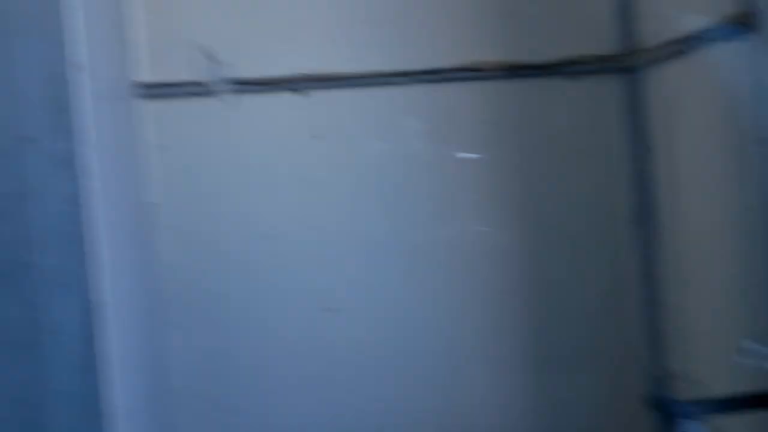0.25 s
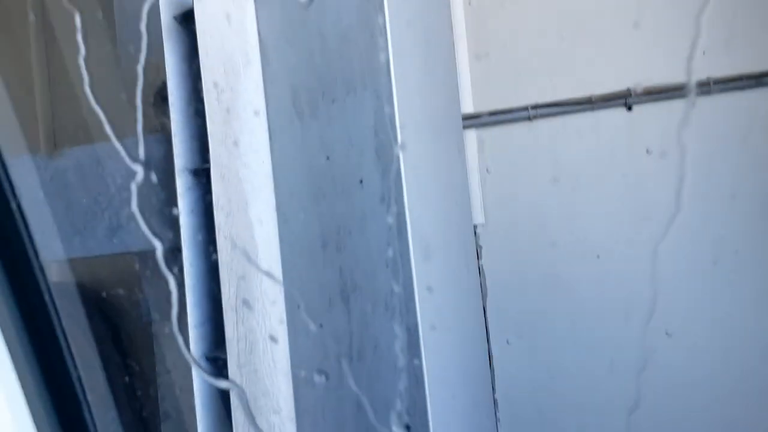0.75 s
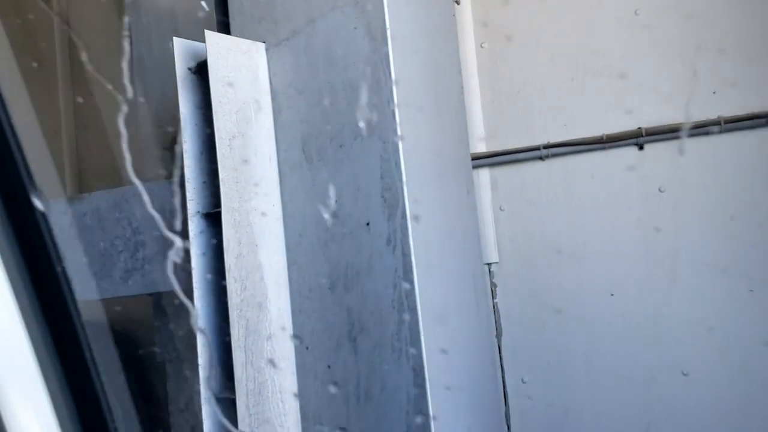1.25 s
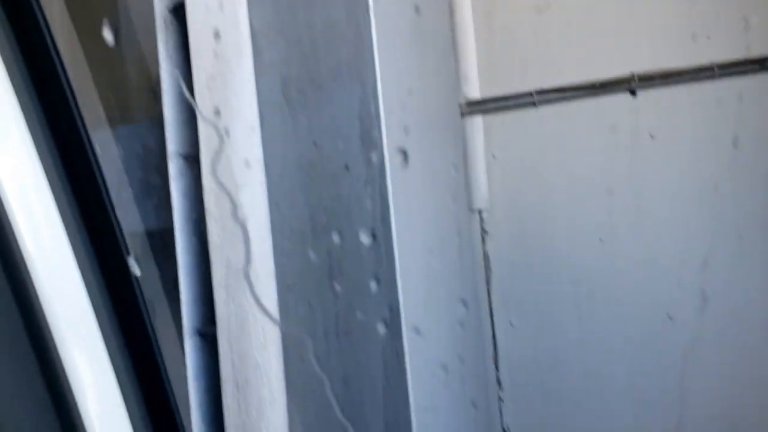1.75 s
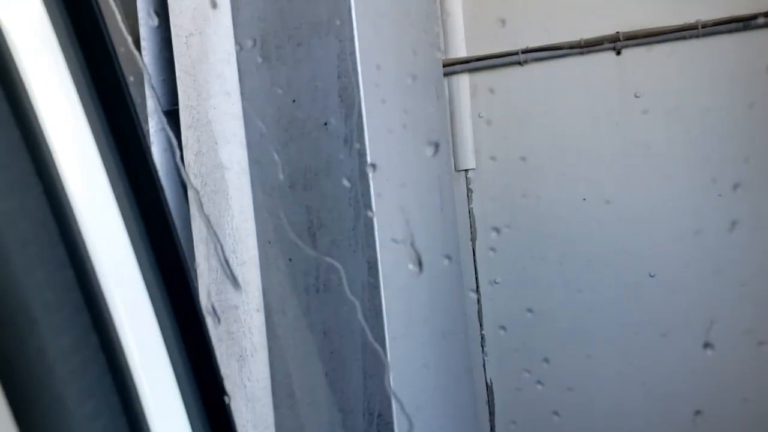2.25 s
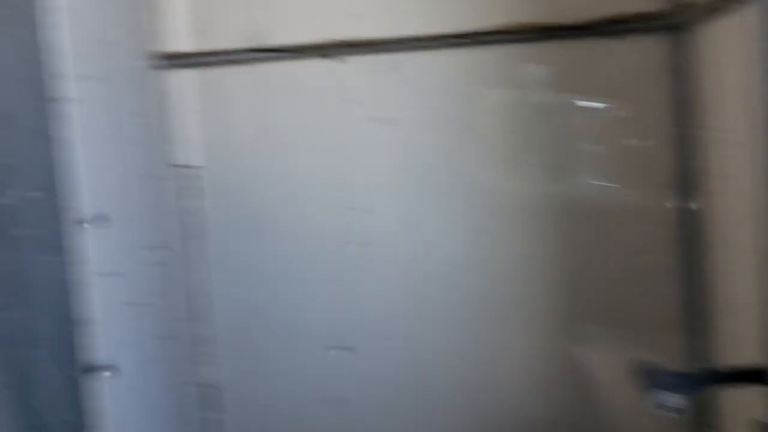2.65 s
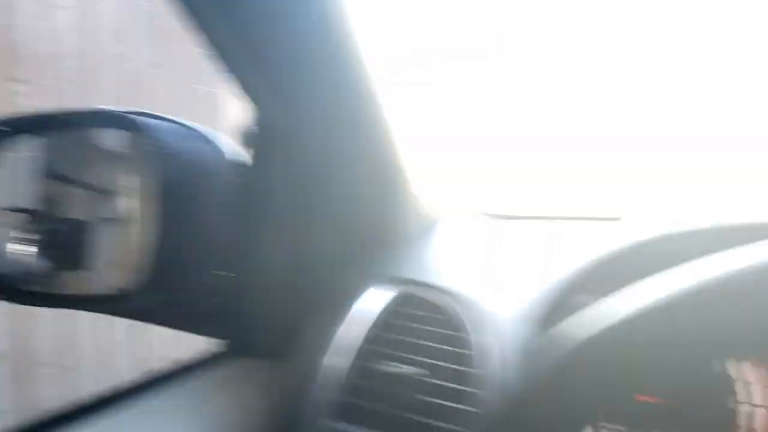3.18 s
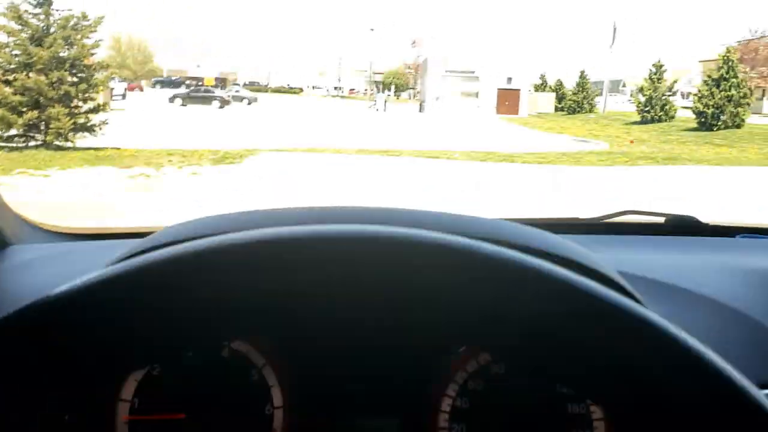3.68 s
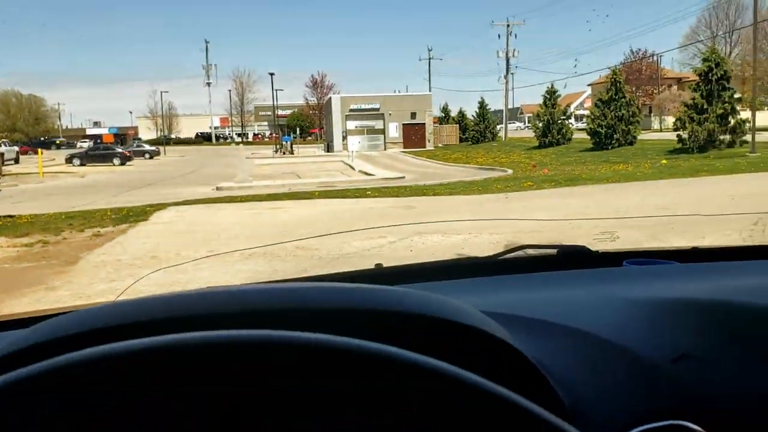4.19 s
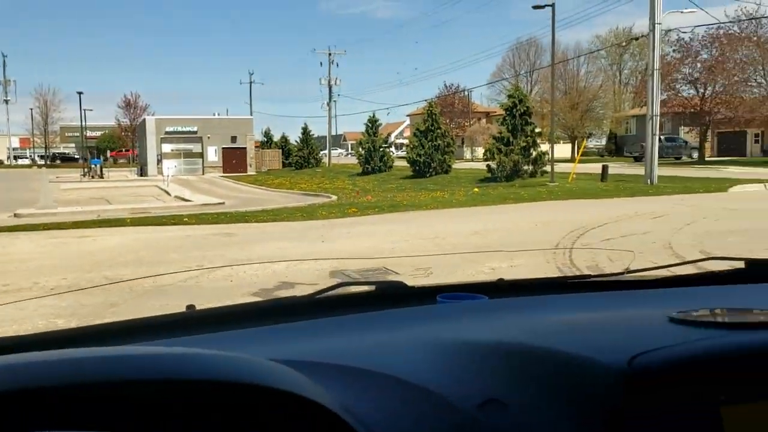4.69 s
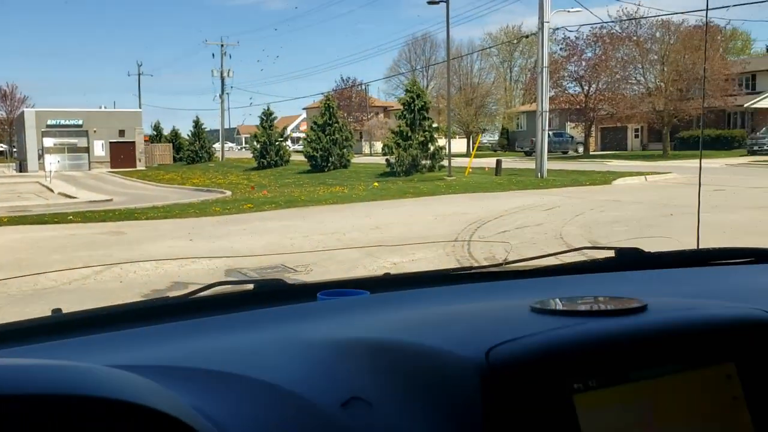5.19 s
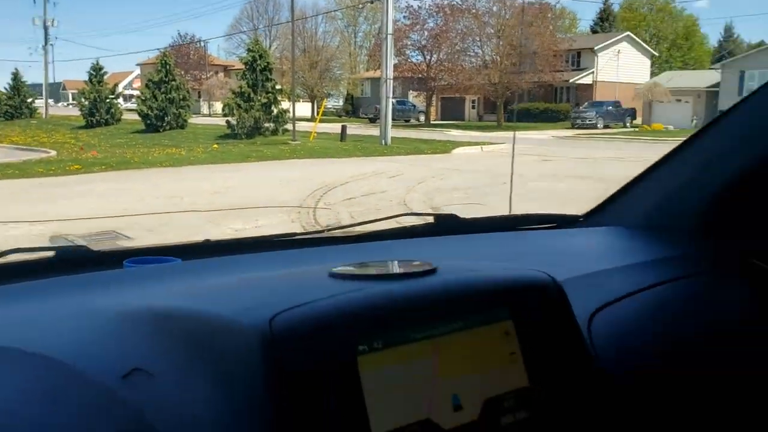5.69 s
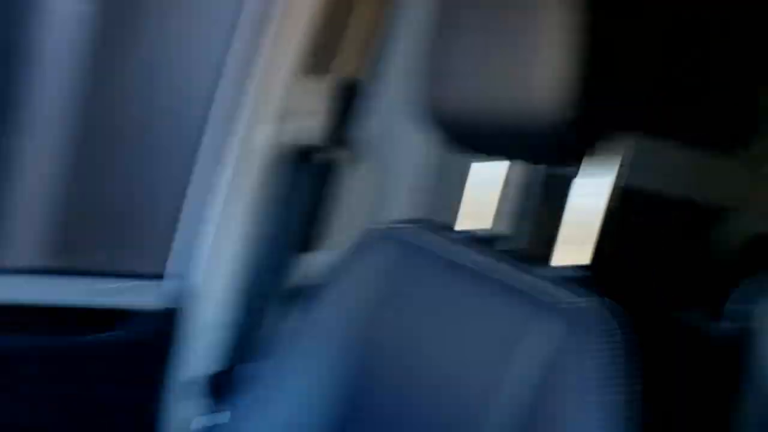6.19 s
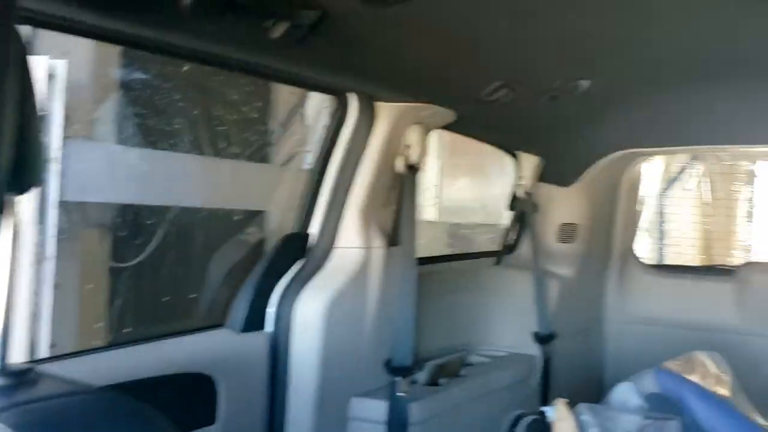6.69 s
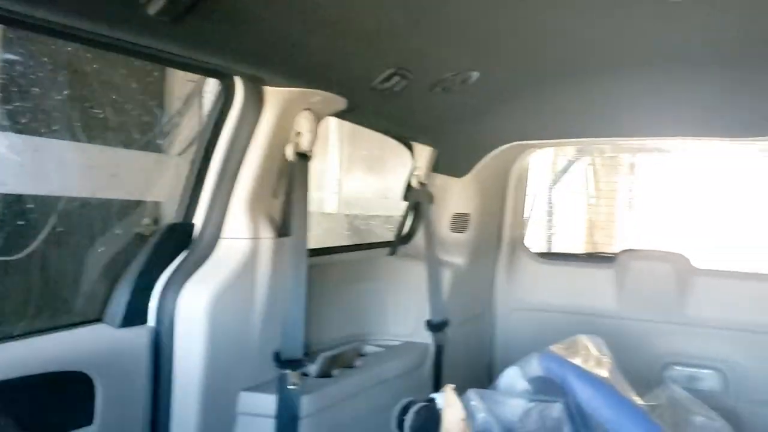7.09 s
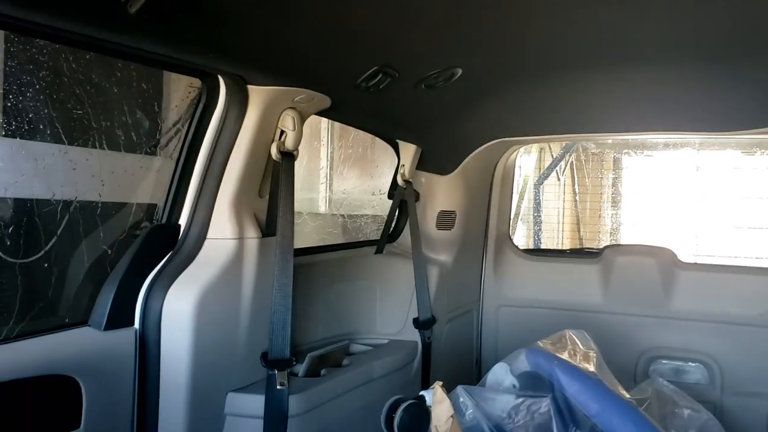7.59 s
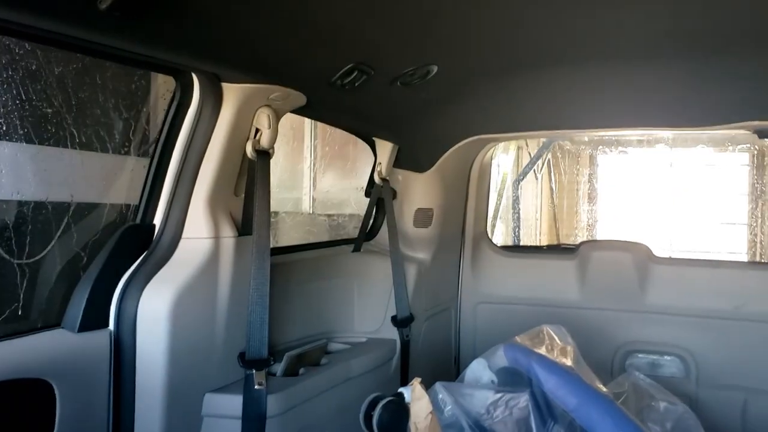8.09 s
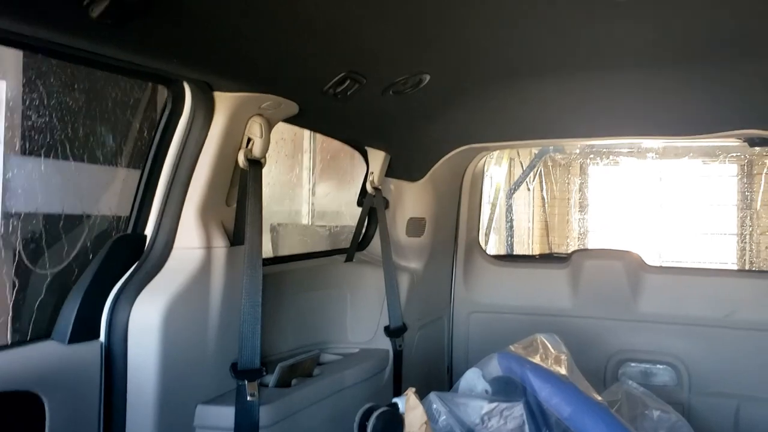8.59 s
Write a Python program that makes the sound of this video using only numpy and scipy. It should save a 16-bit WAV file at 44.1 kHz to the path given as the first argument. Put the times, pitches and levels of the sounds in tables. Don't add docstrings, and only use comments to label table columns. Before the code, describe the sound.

From 0 to about 8.9 seconds, large air dryers in a car wash roar without pause, heard on a handheld stereo phone inside a closed vehicle. Low boom and a wavering deep hum dominate as jets beat the panels and roof; unsteady fan tones barely rise above it, and hiss is dulled by glass. The jets are nearest around 0.4 seconds, then slowly ease until 6, recovering slightly by 8. Very faint key contacts occur from 0.7 to 1.6, with a brighter quick tinkle at 2.75. Cloth slides softly at the start, around 3 and near 6.2. A brief hum surge comes at 5.5. Finger rubbing peaks around 6.2, right-sided. Sparse trim ticks become more common after 6.6, alongside small dry case taps, densest from 8.1 to 8.8. The roar continues to the end.

```python
import sys
import numpy as np
from scipy import signal
from scipy.fft import rfft, irfft
from scipy.io import wavfile
from scipy.ndimage import uniform_filter1d, map_coordinates

SR = 44100
rng = np.random.default_rng(int(sys.argv[2]) if len(sys.argv) > 2 else 0)


def persist_wave(psi):
    counts = np.round(np.clip(psi, -1, 1) * 32767).astype(np.int16)
    wavfile.write(sys.argv[1], SR, np.atleast_2d(counts).T)


def natural_amplitude(level_db):
    exponent = np.asarray(level_db, float) / 20
    return 10 ** exponent


N = 390285


def unit(x):
    return x / np.sqrt(np.mean(x ** 2) + 1e-20)


def along(points, hz):
    f, v = np.transpose(points)
    return np.interp(np.log(hz + 1), np.log(f + 1), v)


def spectrum(points):
    return lambda hz: natural_amplitude(along(points, hz))


def resonant(modes, steep):
    def gain(f):
        power = 0
        for center, width, db in modes:
            peak = abs(f * width / (center * center - f * f + 1j * f * width))
            power = power + (natural_amplitude(db) * peak ** steep) ** 2
        return np.sqrt(power)
    return gain


def filtered(x, response):
    return irfft(rfft(x) * response(np.fft.rfftfreq(N, 1 / SR)), N)


def curves(rows):
    s, *columns = np.transpose(rows)
    return [np.interp(np.arange(N) / SR, s, c) for c in columns]


def wobble(knots_per_s):
    knots = rng.standard_normal(int(N * knots_per_s / SR) + 4)
    return map_coordinates(knots, [np.arange(N) * knots_per_s / SR])


def sides(db):
    ratio = natural_amplitude(-np.asarray(db))
    return np.array([2 / (1 + ratio), 2 * ratio / (1 + ratio)])


# t/s, heading (0 side window, 1 windscreen, 2 rear seats)
HEADING = [
    (0, 0),
    (2.7, 0.12),
    (3.2, 0.8),
    (5.7, 1.4),
    (6.6, 2),
    (8.85, 2),
]


def faced(db, s=None):
    heading, = curves(HEADING)
    if s is not None:
        heading = heading[(s * SR).astype(int)]
    return np.interp(heading, [0, 1, 2], db)


# f/Hz, correlation
LIKENESS = [(30, 0.99), (80, 1), (200, 0.97), (400, 0.81), (550, .5), (800, .2), (1300, -0.29),
            (2200, 0.053)]


def rush(gain, even_s=0):
    def mid_side(hz):
        angle = np.arccos(np.clip(along(LIKENESS, hz), -1, 1)) / 2
        return gain(hz) * [np.cos(angle), np.sin(angle)]

    mid, side = filtered(rng.standard_normal((2, N)), mid_side)
    pair = np.array([mid + side, mid - side]) / np.std(mid)
    if even_s:
        width = round(even_s * SR)
        power = np.abs(uniform_filter1d(uniform_filter1d(mid ** 2, width), width))
        pair = pair / np.sqrt(power / np.var(mid) + 0.15)
    return pair


def swaying(modes, tilt_db):
    first, second = (rush(resonant([mode], 1.817), even_s=0.18) * natural_amplitude(mode[2]) for mode in modes)
    share = natural_amplitude(tilt_db / 2)
    total = np.hypot(share * natural_amplitude(modes[0][2]), natural_amplitude(modes[1][2]) / share)
    return (share * first + second / share) / total


def swell(depth):
    return depth * 2.5 * wobble(8.5)


# t/s, level/dB
NEARNESS = [(0, 3.5), (.4, 4.5), (.6, 3), (1.5, 2), (2.6, 0), (3.6, -0.5), (5, -1.5), (6, -3), (7, -1.5),
            (8.15, -0.5), (8.55, -0.5), (8.85, -1.2)]


def nearness_db():
    return curves(NEARNESS)[0]


# f/Hz, width/Hz, level/dB
BOOM_MODES = [(50, 38, -0.5), (97, 46, 2)]


def boom():
    near_db = nearness_db()
    level_db = faced((-23.5, -23.5, -22.5)) + 1.1 * near_db + swell(1)
    tilt_db = faced((-1, 0.2, -1.5)) - 1.3 * near_db
    return natural_amplitude(level_db) * swaying(BOOM_MODES, tilt_db)


# f/Hz, width/Hz, level/dB
HUM_MODES = [(127.3, 23.8, -1.6), (155.2, 26.3, -0.47)]
# t/s, force/dB, upper over lower hum mode/dB
SIDE_JETS = [(0, -20, 3.5), (.9, -16.5, 2), (1.0, -22.5, 2), (1.15, -19.5, 3), (1.6, -22, 1),
             (1.75, -15, 4.5), (2.8, -18, 0.5), (3, -14, 2), (3.12, -18, -0.5), (3.68, -16, 1.5),
             (3.9, -20.5, -1), (4.7, -17, 0.3), (5.3, -21.5, -2.5), (5.51, -13, -2.5), (5.62, -20, -2.5),
             (7.95, -23, -3), (8.12, -29.5, -4), (8.6, -20, -9.5)]


def hum():
    force_db, tilt_db = curves(SIDE_JETS)
    pan_db = faced((1.5, 3.5, 0.1)) + 0.88 * wobble(5.5)
    return natural_amplitude(force_db + 0.33 + swell(0.46)) * sides(pan_db) * swaying(HUM_MODES, -tilt_db)


# f/Hz, width/Hz, level/dB
CROSS_MODES = [(217.7, 71, 0)]


def cross():
    level_db = faced((-28, -38, -25)) + 0.53 * nearness_db() + swell(0.8)
    return natural_amplitude(level_db) * rush(resonant(CROSS_MODES, 2.22), even_s=0.077)


# f/Hz, width/Hz, level/dB
ROOF_MODES = [(302.6, 45, 1.4), (349, 42, 0), (384, 32, -8.5)]
# t/s, force/dB
OVERHEAD_JET = [(0, -30.5), (.45, -28), (1, -31.5), (1.4, -28.5), (2.3, -32), (3.2, -31), (4, -27.5),
                (4.8, -29), (5.7, -30), (6.7, -28.5), (7.6, -30.5), (8.85, -28)]


def roof():
    force_db, = curves(OVERHEAD_JET)
    return natural_amplitude(force_db - 0.06 + swell(0.6)) * rush(resonant(ROOF_MODES, 1.98), even_s=0.079)


def drumming():
    return boom() + hum() + cross() + roof()


# f/Hz, wander/Hz, level/dB
BLADE_TONES = [(348.2, 2.487, -38), (1730, 3., -72.5)]


def fans():
    out = 0
    for hz, wander_hz, db in BLADE_TONES:
        level_db = db + faced((1, 3, -6.5)) + 3.2 * wobble(1.1)
        phase = 2 * np.pi * np.cumsum(hz + wander_hz * wobble(0.8)) / SR
        out = out + natural_amplitude(level_db) * np.sin(phase)
    return out


# f/Hz, level/dB per Hz
ROAR_SPECTRUM = [(220, -37), (380, -4), (425, -6.5), (668, -16.5), (979, -23.5), (1700, -39), (2210, -67.5),
                 (3740, -120)]
# f/Hz, level/dB per Hz
HISS_SPECTRUM = [(710, -21), (1200, -2), (1580, -6.5), (2150, -5), (2500, -6), (3060, -7.5), (4580, -16.5),
                 (5950, -29.5), (9000, -39), (11700, -63.5), (19800, -120)]


def jets():
    near_db = nearness_db()
    roar_db = faced((-43, -40.5, -39)) + 0.88 * near_db + 3.0 + 1.2 * wobble(6.8)
    hiss_db = faced((-55, -54.5, -56)) + near_db - 0.38 + 0.5 * wobble(4.3)
    pane_db = faced((-56, -59.5, -63)) + near_db - 5.5
    roar = natural_amplitude(roar_db) * rush(spectrum(ROAR_SPECTRUM))
    hiss = natural_amplitude(hiss_db) * rush(spectrum(HISS_SPECTRUM))
    pane = natural_amplitude(pane_db) * rush(resonant([(2670, 1100, 0)], 2.5))
    return roar + sides(faced((8.5, 9, 12.5))) * (hiss + pane)


def strokes(rows, rise_s, extra_db=0):
    t = np.arange(N) / SR
    extra_db = extra_db + np.zeros(len(rows))
    power = 0
    for (s, hold_s, db, fade_s, *_), more_db in zip(rows, extra_db):
        rise_db = 10 * np.clip((s - t) / rise_s, 0, None)
        fade_db = 10 * np.clip((t - s - hold_s) / max(fade_s, .02), 0, None)
        power = power + natural_amplitude(2 * (db + more_db - rise_db - fade_db))
    return power


# t/s, hold/s, level/dB, fade/s per 10 dB
SEAT_SLIDES = [(0, 0.44, -68, 1), (2.72, .1, -68, 0.3), (2.97, .12, -62.5, 0.33), (3.45, .2, -75.5, 0.5),
               (4.2, .1, -77.5, -0.2), (4.45, .25, -77, 0.5), (4.95, .25, -73.5, .4), (5.7, .3, -75.5, 0.6),
               (6.18, .17, -68, 0.4), (7.3, 0.5, -79.5, .2), (8.15, 0.11, -74, 1), (8.35, .35, -77, -0.2)]
# f/Hz, level/dB per Hz
WEAVE_SPECTRUM = [(2100, -29), (3500, -3), (4400, -3), (5100, -10.5), (7700, -13), (8500, -18.5),
                  (9700, -7.5), (11500, -8), (12500, -10.5), (13500, -26), (15700, -31.5)]
# f/Hz, level/dB per Hz
SHEEN_SPECTRUM = [(11000, -41.5), (12500, -2.5), (14000, 0.5), (15800, -3.5)]


def clothes():
    rest_db = -81.5
    seat = np.sqrt(strokes(SEAT_SLIDES, rise_s=.15) + natural_amplitude(2 * rest_db))
    weave = seat * natural_amplitude(3.5 + 0.7 * wobble(12)) * rush(spectrum(WEAVE_SPECTRUM))
    sheen_level = (seat / natural_amplitude(rest_db)) ** 1.2 * natural_amplitude(-84.5 + 1.6 * wobble(6))
    sheen = sheen_level * rush(spectrum(SHEEN_SPECTRUM))
    return weave * natural_amplitude([[.1], [-2.5]]) + sheen * natural_amplitude([[2.5], [-5]])


# f/Hz, width/Hz, level/dB
PORT_CAVITY = [(10100, 1600, 2), (11700, 2000, 1.5), (14500, 2500, -10.5)]
# t/s, hold/s, level/dB, fade/s per 10 dB, brightness/dB
FINGER_DRAGS = [(2.644, .06, -71, 0.3, -3), (4.24, .05, -74.5, 0.5, -1.5), (4.484, 0.16, -73, .15, -9.5),
                (5.1, .3, -74.5, 0.4, -12.5), (5.85, 0.18, -69, .2, -2), (6.133, .1, -62.5, 0, -2.5),
                (6.267, .08, -59, 0.1, -2.5), (6.4, .12, -64, 0.15, -12), (6.581, .2, -71.5, .3, -12),
                (6.997, .4, -75.5, 0, -11.5), (7.55, .2, -72, .08, -11.5), (8.032, 0.27, -69, -0.2, -11.5),
                (8.401, .06, -64, 0.3, -12), (8.518, .1, -62, -0.4, -12.5), (8.699, .15, -69, .2, -8.5)]


def finger():
    def cavity(modes):
        return unit(filtered(rng.standard_normal(N), resonant(modes, 1.8)))

    grip_s = .06
    bright_db = np.transpose(FINGER_DRAGS)[4]
    slips = unit(natural_amplitude(2.5 * wobble(300) + 1.5 * wobble(14)))
    body = np.sqrt(strokes(FINGER_DRAGS, grip_s)) * cavity(PORT_CAVITY)
    bright = np.sqrt(strokes(FINGER_DRAGS, grip_s, bright_db)) * cavity(PORT_CAVITY[2:])
    return natural_amplitude(2.5) * slips * (body + bright) * natural_amplitude([[-30.], [0]])


# f/Hz, level/dB, t60/s
KEY_MODES = [(7400, -8, 0.054), (9500, -4, .06), (12500, -6.5, .08), (15300, -13, .04)]
# t/s, level/dB, lowest mode/dB, two upper modes/dB
KEY_CONTACTS = [(.72, -69.5, 7, 3.5), (.85, -72.5, 3, 6), (.982, -71, 14, -3), (1.06, -70, 7.5, 2.5),
                (1.11, -72, 0, 2.5), (1.27, -73, -2, 3), (1.39, -70, -10, 2), (1.41, -67, -8, 2.5),
                (1.468, -69, -8, 1), (1.512, -68, -8, -1), (1.55, -76, -5, -2.5), (2.74, -56.5, -5, -9),
                (2.762, -54.5, -6, -12.5), (2.778, -58.5, -4, -13.5), (2.79, -57.5, -4, -11.5),
                (2.802, -59, -6, -7), (2.822, -62, -6, -6.5), (2.835, -64, -5, -4)]


def keys():
    def pair(hz):
        detuned_hz = hz * rng.normal(1, .008, (2, 1))
        return np.sin(2 * np.pi * detuned_hz * t).sum(axis=0)

    out = np.zeros(N + SR)
    t = np.arange(SR // 8) / SR
    onset = 1 - np.exp(-t / .001)
    for s, db, low_db, high_db in KEY_CONTACTS:
        ring = [natural_amplitude(level + rng.normal(0, 2.5) - 60 * t / t60) * pair(hz) for hz, level, t60 in KEY_MODES]
        mix = natural_amplitude(low_db) * ring[0] + ring[1] + natural_amplitude(high_db) * (ring[2] + ring[3])
        out[round(s * SR):][:len(t)] += natural_amplitude(db) * mix * onset
    return out[:N] * sides(4.5)[:, None]


def bursts(events, fall):
    out = np.zeros((2, N + SR))
    for s, gain in events:
        crack = fall * rng.standard_normal((2, len(fall)))
        crack *= np.linalg.norm(fall) / np.linalg.norm(crack, axis=1, keepdims=True)
        out[:, round(s * SR):][:, :len(fall)] += gain * crack
    return out[:, :N]


# t/s, peak/dB, low part/dB
TRIM_TICKS = [(1.1097, -66, -1), (1.2139, -61.5, -8), (1.6042, -52, -10), (1.6103, -58, 0.5),
              (2.0474, -62.5, -8), (2.7072, -56, -7), (3.4567, -58, -5), (4.5911, -54.5, -17),
              (5.6757, -59, -14), (5.7442, -53.5, -14.5), (6.649, -55.5, -9), (6.7511, -52.5, -9.5),
              (6.979, -59.5, -8.5), (7.3151, -62.5, -7), (7.4162, -55.5, -14), (7.5776, -61.5, -6),
              (7.6136, -51, -16), (7.762, -57, -10), (8.1708, -51, -19), (8.2417, -55.5, -5),
              (8.2481, -51.5, -8), (8.3464, -55, -13)]


def trim():
    t = np.arange(SR // 12) / SR
    fall = natural_amplitude(-60 * t / .012) + natural_amplitude(-9.5 - 60 * t / .1)
    at, peak_db, low_db = np.transpose(TRIM_TICKS)

    def part(level_db, hz, width_hz):
        events = [(s, natural_amplitude(db) * sides(2)[:, None]) for s, db in zip(at, level_db)]
        return filtered(bursts(events, fall), resonant([(hz, width_hz, 0)], 1.8))

    middle = part(peak_db + 5.5, 10000, 3500)
    low = part(peak_db + low_db + 9.0, 7600, 2200)
    top = part(peak_db + faced((-15, -9.5, -7.5), at) + 12.5, 14200, 3500)
    return middle + low + top


# t/s, peak/dB
CASE_TAPS = [(4.2694, -61), (4.537, -55.5), (4.891, -66.5), (6.4915, -49), (6.6002, -54), (6.6242, -62),
             (6.6492, -57), (6.7138, -51.5), (6.8486, -60), (6.886, -57), (7.148, -57.5), (7.2374, -57.5),
             (7.5148, -59), (7.7198, -48.5), (8.0797, -55), (8.1519, -47.5), (8.1652, -48), (8.1983, -55.5),
             (8.325, -53.5), (8.3998, -54), (8.4668, -50), (8.5644, -46), (8.754, -56.5), (8.8114, -50)]


def taps():
    t = np.arange(SR // 12) / SR
    events = [(s, natural_amplitude(db + 9.0) * natural_amplitude([[-16.], [0]])) for s, db in CASE_TAPS]
    return filtered(bursts(events, natural_amplitude(-60 * t / .009)), resonant(PORT_CAVITY, 2.2))


def scene():
    return drumming() + fans() + jets() + clothes() + finger() + keys() + trim() + taps()


def low_pass(x):
    return signal.sosfilt(signal.butter(12, 15800, fs=SR, output="sos"), x)


# f/Hz, left over right/dB
PORT_BALANCE = [(50, 0.5), (150, 1.5), (350, 5), (1000, 6), (2500, -0.5), (5000, 4), (5700, 15),
                (6400, 23.5), (8000, 25), (8900, 6), (9600, -1), (12000, -0.5), (15000, 3)]
# f/Hz, phase/rad
PORT_LAG = [(30, .1), (90, .3), (150, .42), (300, .5), (600, .45), (900, 0)]


def record(dry):
    def ports(hz):
        lag = np.exp(.5j * along(PORT_LAG, hz) * np.array([[1], [-1]]))
        bass_cut = hz ** 2 / np.hypot(hz ** 2, 30.0 ** 2)
        return sides(along(PORT_BALANCE, hz)) * lag * bass_cut

    return low_pass(filtered(dry, ports))


dry = scene()
out = record(dry)
persist_wave(out)
```